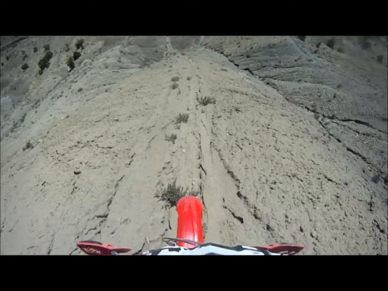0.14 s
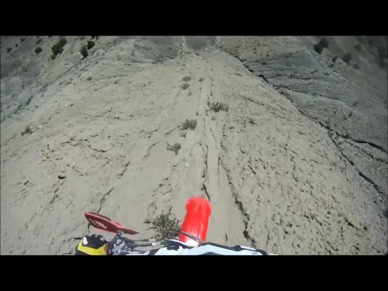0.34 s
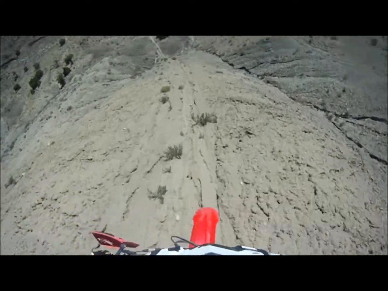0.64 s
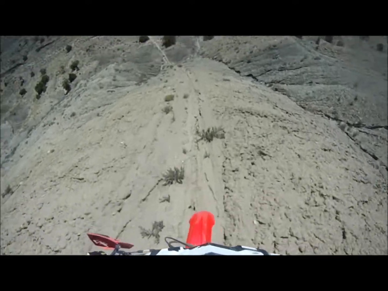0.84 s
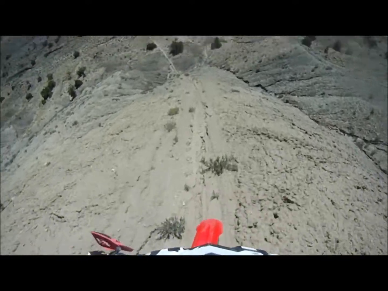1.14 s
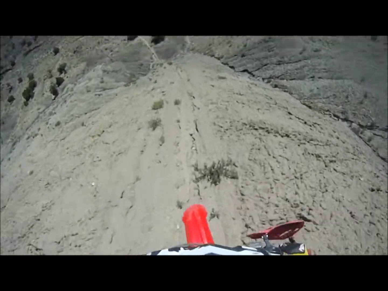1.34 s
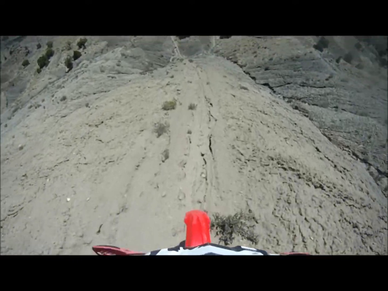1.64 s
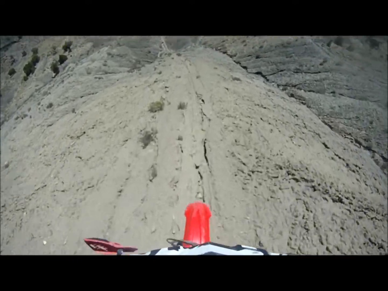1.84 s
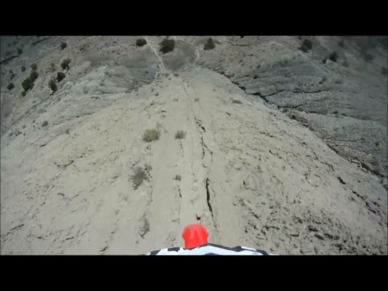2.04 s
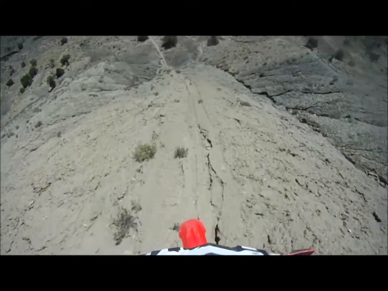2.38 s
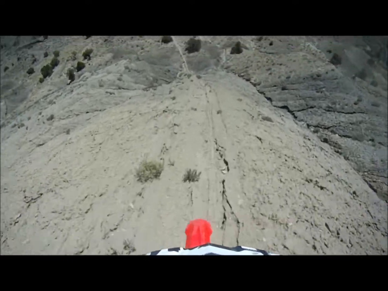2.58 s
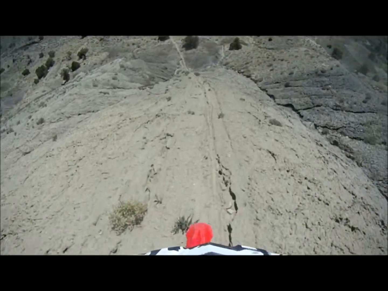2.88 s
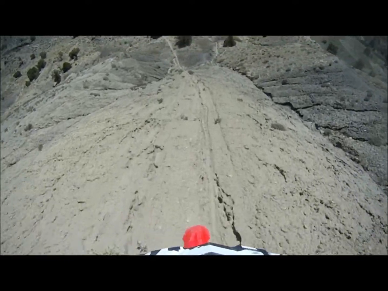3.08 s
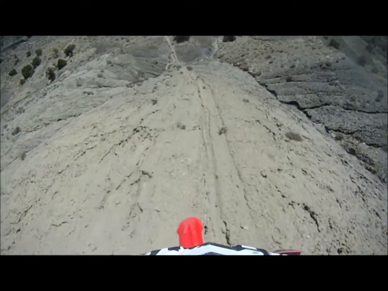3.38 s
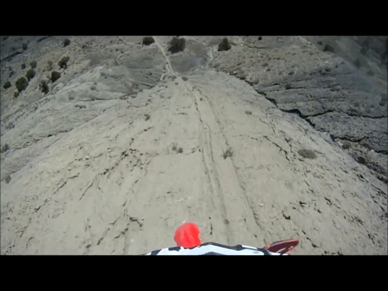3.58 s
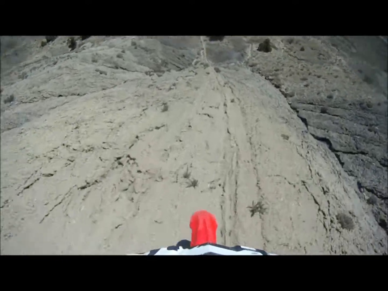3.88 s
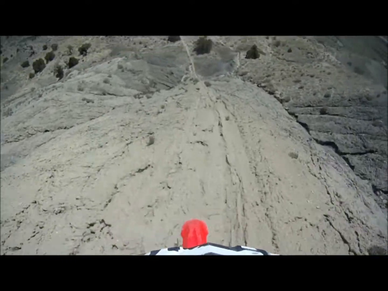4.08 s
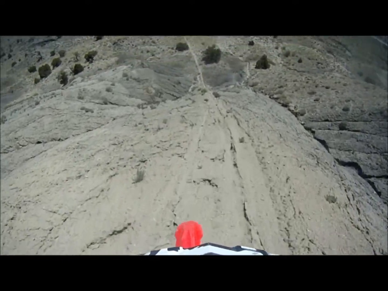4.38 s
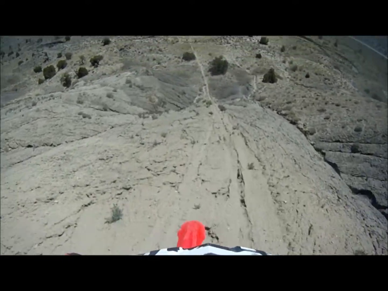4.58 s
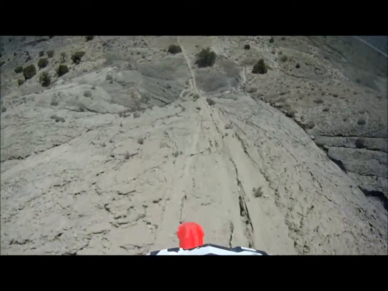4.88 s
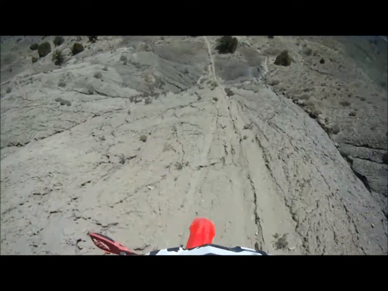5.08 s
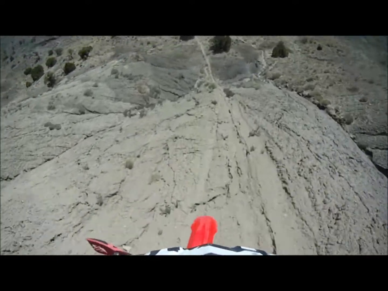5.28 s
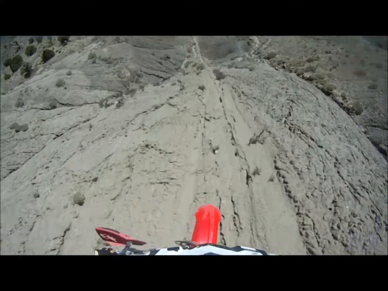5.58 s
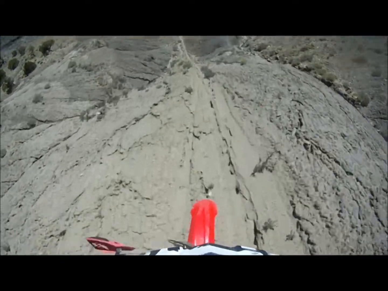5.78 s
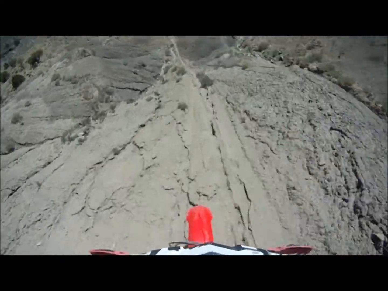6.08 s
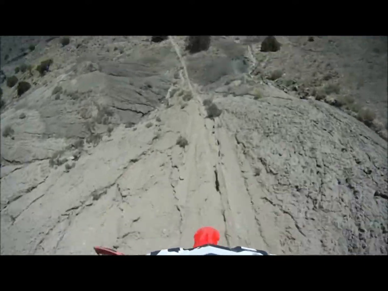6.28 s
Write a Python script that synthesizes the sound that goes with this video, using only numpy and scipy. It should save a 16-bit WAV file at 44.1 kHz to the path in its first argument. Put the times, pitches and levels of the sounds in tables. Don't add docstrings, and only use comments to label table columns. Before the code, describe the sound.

A dirt bike creeps down a steep rutted trail, its muffled engine puttering evenly beneath a dry mechanical rattle. Small ticks, dull frame jolts and hard case clacks interrupt it, with low flutter after bumps. A thin broken squeak passes around three seconds, then gravel hiss grows stronger. A final heavy double crack briefly ducks the sound. The close microphone is enclosed in plastic, with coarse, harsh treble.

```python
import sys
import numpy as np
from scipy import signal
from scipy.fft import rfft, irfft
from scipy.io import wavfile
from scipy.ndimage import uniform_filter1d

SR = 44100
rng = np.random.default_rng(int(sys.argv[2]) if len(sys.argv) > 2 else 0)


def persist_wave(psi):
    counts = np.round(np.clip(psi, -1, 1) * 32767).astype(np.int16)
    wavfile.write(sys.argv[1], SR, np.atleast_2d(counts).T)


def convert_level_to_amplitude(level_db):
    exponent = np.asarray(level_db, float) / 20
    return 10 ** exponent


N = 283563

# (time [s], firing rate [Hz])
REVS = [(0.0, 24.745), (0.516, 27.405), (0.723, 26.495), (1.134, 25.431), (1.541, 25.011), (1.836, 26.439),
        (2.079, 25.782), (2.44, 25.467), (2.915, 25.664), (3.323, 28.344), (3.75, 24.961), (4.01, 27.14),
        (4.264, 27.372), (4.469, 25.698), (4.772, 24.968), (5.484, 27.184), (5.85, 25.487), (6.43, 25.974)]
# (time [s], engine shake [dB], tyre scrub [dB])
RIDE = [(0.0, -2, 4.5), (0.15, 0, -2.5), (0.7, 0, -1), (1.2, -1, -4), (1.47, -3.5, -0.5), (1.7, 0.5, 0.5),
        (2.2, 1.5, -3), (2.45, -1, -1.5), (2.7, 0.5, -3.5), (3.3, 0.5, 2.5), (3.6, -0.5, 2), (4.0, 2.5, 3),
        (4.35, -1, 4), (4.7, 2, 9.5), (5.3, -1.5, 6), (5.55, -2, 10.5), (6.0, -1, 6), (6.43, -5, 6)]
# (pitch [Hz], T60 [s], level [dB], signed gain [-], arrival [ms])
SILENCER = [(108, 0.075, -17.5, -1.4, 3.3), (156.4, 0.075, 3.5, 0.93, 2.5), (186.7, 0.068, -4, 0.9, 1.8),
            (293.4, 0.089, 3.5, -0.73, 1.1), (374, 0.032, -9, -1.6, 0.42), (450.6, 0.04, -7, -2.08, 0.52),
            (606, 0.055, -16.5, -1.76, 0.45)]
# (pitch [Hz], T60 [s], level [dB])
HOUSING = [
    [(651, 0.057, -6), (747, 0.041, -3.5), (974, 0.028, -2), (1120, 0.027, -1.5), (1356, 0.044, -1)],
    [(1929, 0.015, 1.5), (2126, 0.017, -1), (2100, 0.023, -7.5)],
    [(2780, 0.031, -9), (3000, 0.015, 0.5), (3420, 0.018, -7), (3730, 0.018, -3), (4350, 0.015, -9),
     (4980, 0.015, -11.5)],
]
# (level [dB], ring time factor [-])
RATTLE = [(-2, 0.9), (0.5, 1.4), (-15.5, 0.45)]
# (frequency [Hz], density [dB per Hz])
GRAVEL = [(200, -37), (350, -25.5), (700, -10.5), (1600, -20.5), (2100, -18), (2600, -20.5), (3700, -27),
          (4200, -31.5), (5300, -38.5), (5900, -37)]
# (time [s], peak [dB], pitch [Hz], half length [ms])
SWINGS = [(0.049, -27, 30.1, 44.0), (0.33, -28.5, 29.7, 64), (0.477, -36, 30.96, 20.0),
          (0.745, -27, 31.4, 44), (1.068, -37, 30.15, 41), (1.297, -32.5, 30.05, 49),
          (1.548, -40, 30.2, 71), (1.728, -26, 32, 24), (1.791, -28.2, 32.75, 33), (1.965, -38, 31.7, 91.0),
          (2.276, -29.5, 32.4, 47), (2.466, -24.5, 29.8, 40.0), (2.64, -36, 30.8, 23), (2.8, -32, 31.6, 32),
          (3.43, -43.4, 29.27, 107), (3.73, -35.4, 32.3, 130), (3.88, -19.5, 32.12, 30),
          (4.001, -26.5, 30.96, 32), (4.306, -26, 31.32, 18), (4.496, -29, 32.4, 73),
          (4.73, -33, 27.36, 33), (4.867, -33, 30.05, 130), (5.128, -25.8, 28.8, 45),
          (5.299, -40, 30.84, 101.0), (5.581, -30.5, 34.1, 31), (5.718, -34.7, 31.72, 26.0),
          (5.863, -39, 32.24, 97), (6.12, -24.5, 31.77, 23.3), (6.225, -23, 30.7, 51),
          (6.39, -33, 29.33, 30.0)]
# (frequency [Hz], density [dB per Hz])
BUFFET = [(12, -10), (30, -3), (45, -11), (60, -23.5), (100, -22), (170, -26), (300, -31), (500, -56)]
# (time [s], low family [dB], low pitch [Hz], middle [dB], high [dB])
KNOCKS = [(0.684, -27, 634, -32, -32.5), (1.357, -40, 687.7, -48, -26), (1.588, -17, 1120, -4.5, -1.5),
          (2.148, -10, 746, -17.5, -15.5), (2.423, -32, 716.8, -27, -36), (2.604, -23.5, 795.2, -20, -19),
          (3.623, -17.5, 650, -22, -25), (3.89, -8.5, 715, -14, -10), (3.945, -16.5, 800, -28, -41),
          (3.949, -12.5, 685, -2.5, -1.5), (4.786, -6, 700, -10, -12.5), (4.797, -16.5, 745, -23, -43.5),
          (6.1615, 2, 903, -3.5, -15.5), (6.167, -8.5, 610, -10.5, -23)]
# (time [s], low family [dB], low pitch [Hz], middle [dB], contact [ms])
THUDS = [(0.168, -38, 1093, -32, 4), (0.244, -20.5, 960, -29.5, 3.4), (0.666, -16, 756, -31, 6.5),
         (0.673, -20.5, 620, -31, 5), (1.255, -29, 631.9, -26, 3.2), (1.352, -21.5, 705, -38, 2.6),
         (1.741, -30, 1149, -29.5, 3), (2.408, -21.5, 598, -38, 6.2), (2.414, -16.5, 761, -29, 4.9),
         (4.254, -28.5, 650, -53, 2.5), (4.638, -33, 1090, -28, 2.4), (5.411, -44, 992, -33, 2.57),
         (6.156, -5.5, 854, -20, 7)]
CONTACT_GRIT = .7, 1.1, 1.8
# (time [s], level [dB], pitch [Hz], contact [ms])
TICKS = [(0.0204, -49.5, 3050, 3.7), (0.0695, -49, 2999, 4.3), (0.194, -43.5, 4384, 8.513),
         (0.4693, -47, 3447, 4.024), (0.557, -40.5, 3830, 4.2), (1.3177, -45.5, 2911, 6.1),
         (1.6556, -48.5, 3187, 6.9), (1.7002, -51, 3191, 4.61), (2.5478, -48, 3730, 7),
         (2.5715, -44.5, 2968, 4.2), (2.6902, -47.5, 4370, 3.97), (3.0525, -51, 3012, 2.996),
         (3.4332, -41, 3875, 4.2), (3.742, -38.5, 3060, 2.9), (3.9913, -47, 3000, 3.592),
         (4.0402, -44, 4325, 8.9), (4.116, -48, 2711, 5.116), (4.133, -45, 4270, 4.177),
         (4.7052, -56, 3039, 3.3), (4.8114, -43, 3420, 2.8), (5.14, -40.5, 2710, 3.09),
         (5.2156, -37.5, 3790, 5.2), (5.3035, -42.5, 3840, 3.4), (5.688, -39.5, 2910, 2.7),
         (6.0489, -49, 2839, 3.8), (6.2716, -36, 3000, 4), (6.3039, -39, 5330, 4.417),
         (6.3438, -43, 3757, 2.7), (6.348, -42, 3904, 4.1), (6.3997, -36, 3440, 5.9)]
# (time [s], level [dB], pitch [Hz], T60 [s])
JOLTS = [(0.069, -41.5, 61.8, 0.1185), (0.235, -30, 64.75, 0.089), (0.404, -47.5, 114, 0.1202),
         (0.663, -20.5, 116.2, 0.16), (1.245, -34, 110.8, 0.14), (1.347, -34, 96, 0.1916),
         (2.143, -29, 125.7, 0.086), (2.407, -24, 105.6, 0.096), (3.618, -53, 74.4, 0.16),
         (3.937, -33.5, 83.5, 0.198), (4.254, -31.5, 128.7, 0.14), (4.382, -49, 87.69, 0.123),
         (4.782, -24.5, 83.54, 0.11), (5.428, -32.5, 122.1, 0.12), (5.67, -30, 115.9, 0.21),
         (6.067, -32, 89.5, 0.25), (6.152, -16, 115.2, 0.22)]
# (time [s], peak [dB], pitch [Hz], half length [ms])
SQUEAKS = [(2.98, -41.5, 1005, 16), (3.175, -43.5, 990, 20), (3.285, -41.5, 1005, 21),
           (3.365, -46, 1005, 12), (3.43, -46, 1010, 31), (3.51, -44, 1020, 10), (3.07, -50, 960, 30),
           (5.475, -43, 725, 19.7), (5.55, -47, 720, 22), (5.635, -45, 715, 18), (5.76, -47, 720, 25)]

FIRST_TURN_CYCLES = -0.433
EXHAUST_DB, MUFFLED_DB_PER_SCRUB_DB = -43, 0.22
LOOSE_DB, LOOSE_AT_DB = -2, -29.5
LOW_RATTLE_DB, UPPER_RATTLE_DB, GRAVEL_DB = -46.5, -46, -52
LOW_DB_PER_SHAKE_DB, UPPER_DB_PER_SHAKE_DB = 1.1, 0.87
MOUNT_REST_DB = -46
KNOCK_MS, THUD_HIGH_DB = 1.86, -7
HIGH_CHATTER_HZ, LIGHTER_HZ_PER_DB, HIGHEST_CHATTER_HZ = 3250, 14, 4200
DUCK, DUCK_LAG_S, DUCK_RELEASE_S = 33, 0.016, 0.023
TOP_HZ = 15350


def curves(table):
    s, *columns = np.transpose(table)
    t = np.arange(N) / SR
    return [np.interp(t, s, column) for column in columns]


def unit(x):
    return x / np.sqrt(np.mean(x ** 2))


def ring(hz, t60_s, late_ms=0.):
    t = np.maximum(np.arange(8192) / SR - late_ms / 1000, 0)
    return np.sin(2 * np.pi * hz * t) * 1000. ** (-t / t60_s)


def family(modes):
    return sum(convert_level_to_amplitude(db) * ring(hz, t60_s) for hz, t60_s, db in modes)


def walk(rate_hz):
    k = int(SR / rate_hz)
    steps = np.repeat(rng.standard_normal(N // k + 1), k)
    slewed = uniform_filter1d(uniform_filter1d(steps, k), k)
    return unit(slewed[:N])


def coloured(x, spectrum):
    hz, db = np.transpose(spectrum)
    bins_hz = np.maximum(np.fft.rfftfreq(N, 1 / SR), 1)
    gain = convert_level_to_amplitude(np.interp(np.log(bins_hz), np.log(hz), db))
    return unit(irfft(rfft(x) * gain, N))


def swells(events):
    t = np.arange(N) / SR
    size = 0
    for s, db, hz, half_ms in events:
        size = size + convert_level_to_amplitude(db) * np.exp(-.5 * ((t - s) / (max(half_ms, 5) / 1000)) ** 2)
    return np.interp(t, *np.transpose(events)[[0, 2]]), size


def mount_swing():
    hz, size = swells(SWINGS)
    return hz, size + convert_level_to_amplitude(MOUNT_REST_DB)


def exhaust(turns):
    fired = np.flatnonzero(np.diff(np.floor(turns)) > 0)
    chance = rng.standard_normal((len(fired), len(SILENCER) + 2))
    jitter = (.00018 * SR * chance[:, -2]).astype(int)
    fired = np.clip(fired + jitter, 0, N - 1)
    out = 0
    for k, (hz, t60_s, db, sign, late_ms) in enumerate(SILENCER):
        pulses = np.zeros(N)
        pulses[fired] = sign * convert_level_to_amplitude(db + 1.3 * chance[:, -1] + .8 * chance[:, k])
        out = out + signal.fftconvolve(pulses, ring(hz, t60_s, late_ms))[:N]
    return unit(out)


def rattle(turns, low_db, upper_db):
    bunch_db = 1.4 * np.cos(4 * np.pi * (turns + .07)) + 1.2 * np.cos(2 * np.pi * (turns + .05))
    out = 0
    for modes, (share_db, longer), level_db in zip(HOUSING, RATTLE, [low_db, upper_db, upper_db]):
        for hz, t60_s, db in modes:
            spikes_db = 2.2 * rng.exponential(size=N) * (rng.random(N) < .05)
            grains = rng.standard_normal(N) * convert_level_to_amplitude(spikes_db)
            body = signal.fftconvolve(ring(hz, longer * t60_s), ring(hz, 0.0073))
            rung = unit(signal.fftconvolve(grains * convert_level_to_amplitude(bunch_db + 1.5 * walk(40)), body)[:N])
            out = out + convert_level_to_amplitude(level_db + db + share_db - 3.5 + 1.1 * walk(2.56)) * rung
    return out


def gravel():
    grain_db = 1.8 * walk(60) + 0.18 * walk(27)
    return coloured(rng.standard_normal(N) * convert_level_to_amplitude(grain_db), GRAVEL)


def hiss():
    return convert_level_to_amplitude(-57.5) * rng.standard_normal(N)


def wobble():
    hz, size = mount_swing()
    phase = 2 * np.pi * np.cumsum(hz * (1 + 0.0294 * walk(7.6))) / SR
    shudder = coloured(rng.standard_normal(N) * convert_level_to_amplitude(2.4 * walk(7.7)), BUFFET)
    return size * convert_level_to_amplitude(-1.05) * np.sin(phase) + (size * convert_level_to_amplitude(-9.0) + convert_level_to_amplitude(-48.5)) * shudder


def strike(out, s, contact_ms, push, body, peak_db):
    t = np.arange(len(push)) / SR / (max(contact_ms, .2) / 1000)
    force = push * t ** (0.92 + 0.052 * contact_ms) * np.exp(-3.5 * t)
    hit = signal.fftconvolve(force, body)
    i = int(s * SR)
    out[i:i + len(hit)] += (convert_level_to_amplitude(peak_db) * hit / np.abs(hit).max())[:N - i]


def ticks(out):
    for (s, db, hz, contact_ms), rough in zip(TICKS, rng.standard_normal((len(TICKS), 512))):
        strike(out, s, contact_ms, rough, ring(hz, 0.01) + 2.3 * ring(5180, 0.0028), db + 10.5)


def jolts(out):
    for s, db, hz, t60_s in JOLTS:
        strike(out, s, 8., np.ones(512), ring(hz, t60_s), db + 2.0)


def case_knocks(out):
    cracks = [3.3 * ring(1042.6, 0.012),
              1.0 * ring(2200.0, 0.0091),
              2.0 * ring(3070.0, 0.002) + 1.1 * ring(3100.0, 0.0024) + .5 * ring(4100, 0.0042)]
    bodies = [family(modes) + crack for modes, crack in zip(HOUSING, cracks)]
    blows = [(*knock, KNOCK_MS) for knock in KNOCKS]
    for s, low_db, hz, mid_db, contact_ms in THUDS:
        blows.append((s, low_db, hz, mid_db, mid_db + THUD_HIGH_DB, contact_ms))
    blows.sort()
    t = np.arange(512) / SR
    chances = rng.standard_normal((len(blows), 3, 512))
    for (s, low_db, hz, mid_db, high_db, contact_ms), chance in zip(blows, chances):
        high_hz = min(HIGH_CHATTER_HZ - LIGHTER_HZ_PER_DB * high_db, HIGHEST_CHATTER_HZ)
        pitches_hz, levels_db = (hz, 2010, high_hz), (low_db, mid_db, high_db)
        for body, db, pitch_hz, rough, grit in zip(bodies, levels_db, pitches_hz, chance, CONTACT_GRIT):
            push = grit * rough - np.sin(2 * np.pi * pitch_hz * t)
            strike(out, s + 0.00038, contact_ms, push, body, db)


def bumps():
    out = np.zeros(N)
    ticks(out)
    jolts(out)
    case_knocks(out)
    return out


def brake():
    hz, size = swells(sorted(SQUEAKS))
    broken = size * convert_level_to_amplitude(1.86 * walk(30.7))
    return broken * np.sin(2 * np.pi * np.cumsum(hz * (1 + 0.0063 * walk(50.1))) / SR)


def scene():
    turns = FIRST_TURN_CYCLES + np.cumsum(curves(REVS)[0]) / SR
    shake_db, scrub_db = curves(RIDE)
    loose = 1 / (1 + (convert_level_to_amplitude(LOOSE_AT_DB) / mount_swing()[1]) ** 2)
    exhaust_db = EXHAUST_DB - MUFFLED_DB_PER_SCRUB_DB * scrub_db + LOOSE_DB * loose
    low_db = LOW_RATTLE_DB + LOW_DB_PER_SHAKE_DB * shake_db
    upper_db = UPPER_RATTLE_DB + UPPER_DB_PER_SHAKE_DB * shake_db
    mix = convert_level_to_amplitude(exhaust_db) * exhaust(turns) + rattle(turns, low_db, upper_db)
    mix = mix + convert_level_to_amplitude(GRAVEL_DB + scrub_db) * gravel() + hiss()
    mix = mix + wobble() + bumps() + brake()
    return mix[None]


def roll_off(x):
    return signal.sosfilt(signal.butter(12, 16510, fs=SR, output="sos"), x)


def record(dry):
    lowpass = signal.butter(6, 5300, fs=SR, output="sos")
    smooth = signal.sosfilt(lowpass, np.clip(dry, -1.08, 1.08))
    keep = np.exp(-1 / (DUCK_RELEASE_S * SR))
    late = np.roll(smooth, int(DUCK_LAG_S * SR), axis=1)
    power = signal.lfilter([1 - keep], [1, -keep], late ** 2)
    smooth = smooth / np.sqrt(1 + DUCK * power)
    slow = signal.resample_poly(smooth, 40, 147, axis=1)
    held = np.repeat(slow, 4, axis=1)
    out = signal.resample_poly(held, 147, 160, axis=1)[:, :N]
    bins_hz = np.fft.rfftfreq(N, 1 / SR)
    top_db = np.interp(bins_hz, [TOP_HZ, TOP_HZ + 60, TOP_HZ + 2000], [0, -30, -33])
    mix = np.clip(irfft(rfft(out) * convert_level_to_amplitude(top_db), N), -1, 1)
    return roll_off(mix)


dry = scene()
out = record(dry)
persist_wave(out)
```